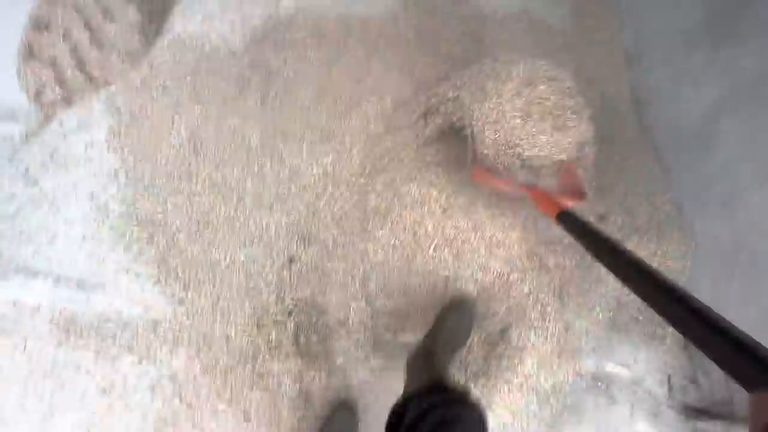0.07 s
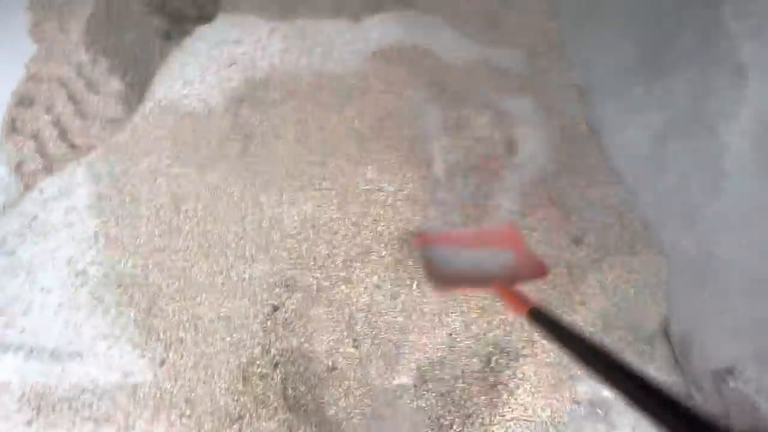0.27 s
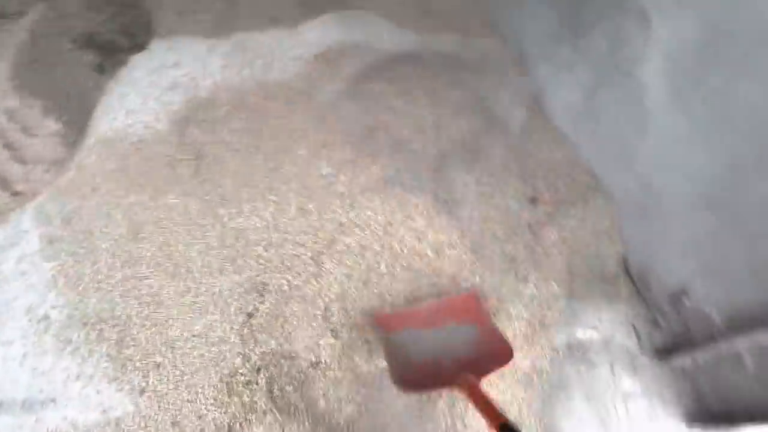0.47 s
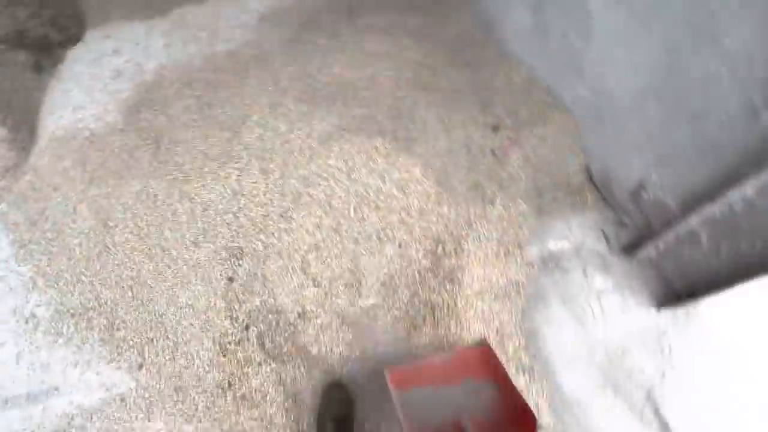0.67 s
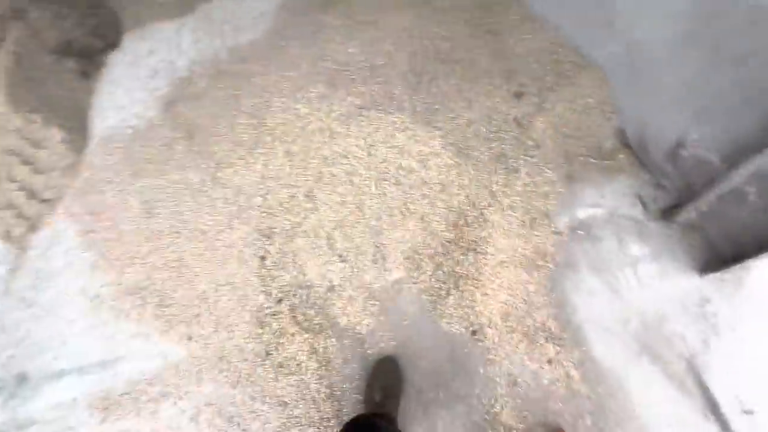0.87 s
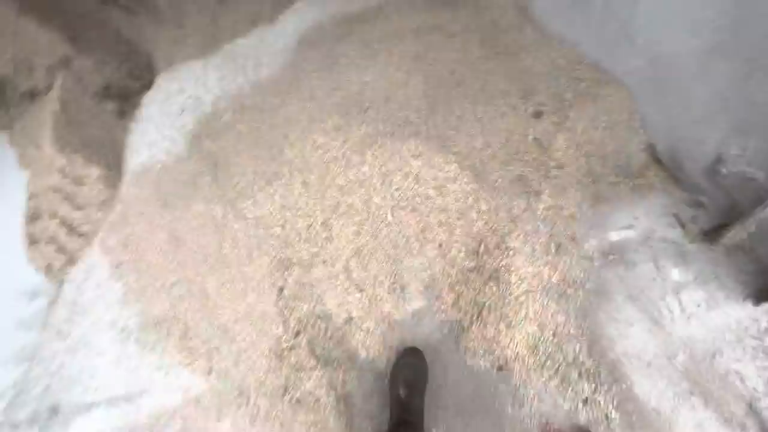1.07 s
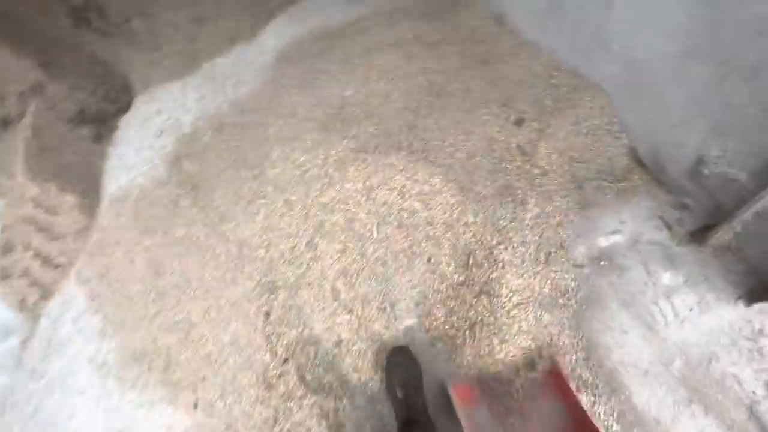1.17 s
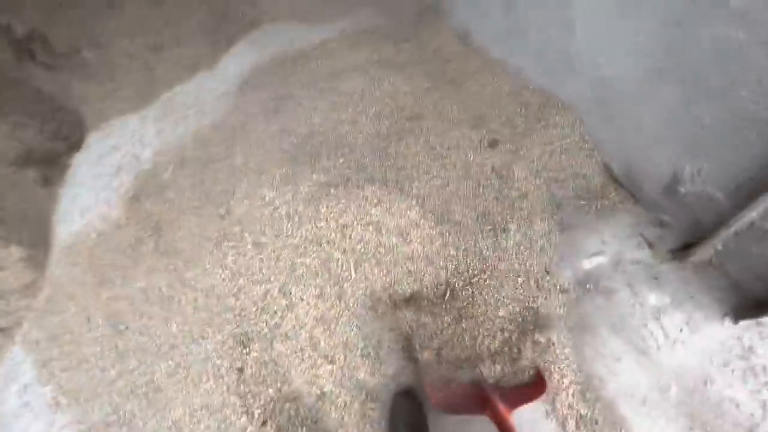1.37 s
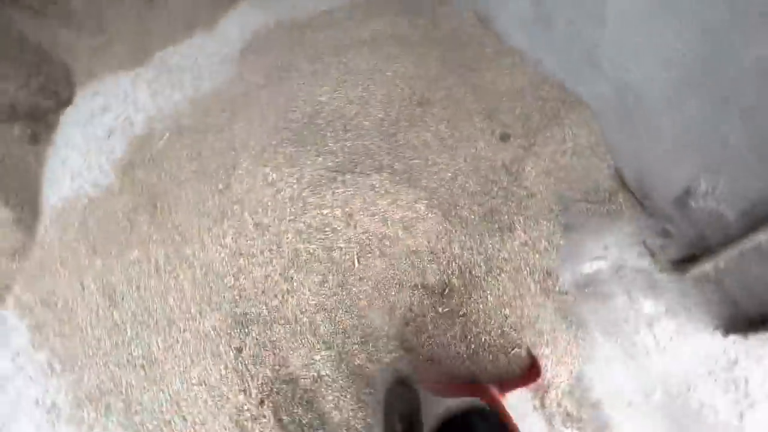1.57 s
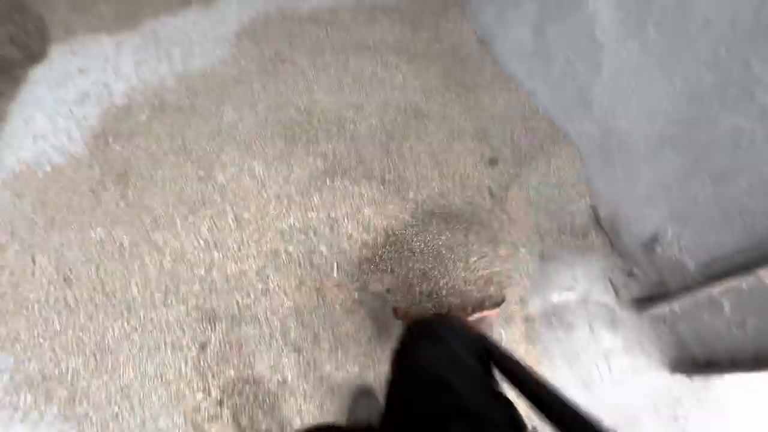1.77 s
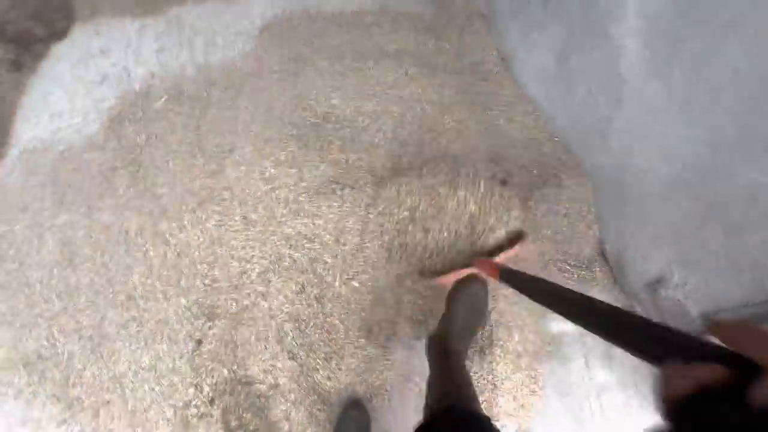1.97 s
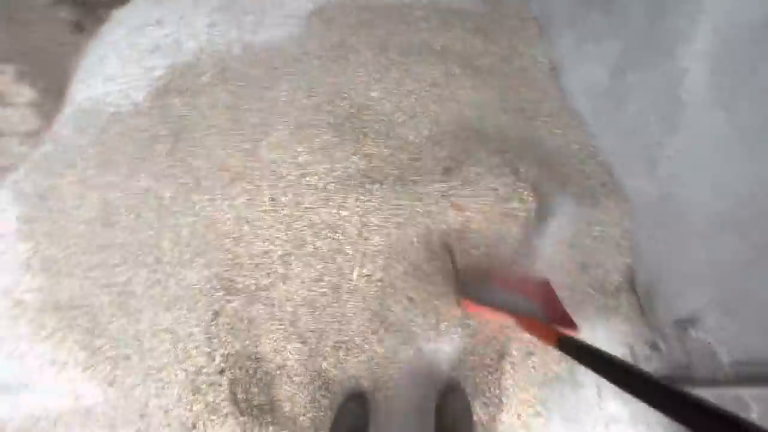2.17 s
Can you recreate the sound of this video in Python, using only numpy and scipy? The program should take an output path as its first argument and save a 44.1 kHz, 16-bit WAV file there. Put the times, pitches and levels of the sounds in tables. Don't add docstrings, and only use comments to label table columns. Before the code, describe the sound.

Plastic shovel scrape across gritty concrete with rattling knocks and husk crackle, followed by a boot step.

```python
import sys
import numpy as np
from scipy import signal
from scipy.fft import rfft, irfft, next_fast_len
from scipy.io import wavfile
from scipy.ndimage import uniform_filter1d, map_coordinates

SR = 44100
rng = np.random.default_rng(int(sys.argv[2]) if len(sys.argv) > 2 else 0)


def store_wav(level_fs):
    pcm = np.round(np.clip(np.atleast_2d(level_fs), -1, 1) * 32767)
    wavfile.write(sys.argv[1], SR, pcm.T.astype(np.int16))


def gain_from_db(level_db):
    decades = np.asarray(level_db, float) / 20
    return 10 ** decades


N = 98122
T = np.arange(N) / SR


def unit(x):
    return x / np.sqrt(np.mean(x ** 2) + 1e-20)


def along(points, hz):
    f, v = np.transpose(points)
    return np.interp(np.log(hz + 1), np.log(f + 1), v)


def wobble(knots_per_s):
    return map_coordinates(rng.standard_normal(2000), [T * knots_per_s], mode="wrap")


def noise():
    return rng.standard_normal((2, N))


def filtered(x, response):
    m = next_fast_len(N + SR // 2)
    return irfft(rfft(x, m) * response(np.fft.rfftfreq(m, 1 / SR)), m)[..., :N]


def body(peaks):
    def response(f):
        total = 0
        for k, (c, w, db) in enumerate(peaks):
            total = total + (-1) ** k * gain_from_db(db) * 1j * f * w / (c * c - f * f + 1j * f * w)
        return total
    return response


def colour(points):
    return lambda hz: gain_from_db(along(points, hz))


def grains(spread_db, life_s):
    size = gain_from_db(spread_db * rng.exponential(size=N)) * (rng.random(N) < .03)
    power = signal.lfilter([1], [1, -np.exp(-1 / (life_s * SR))], size ** 2)
    return unit(np.sqrt(power) * noise())


# t/s, pressure/dB, husk crackle over pressure/dB
STROKE_PRESSURE = [
    (0.977, -46.5, -14),
    (0.997, -32, -10.5),
    (1.06, -24, -5.5),
    (1.1, -20.5, -6.5),
    (1.189, -16, -10.5),
    (1.223, -20, -17),
    (1.273, -21.5, -23),
    (1.292, -26.5, -16.5),
    (1.345, -49.5, -34),
]
SLIPS = [1.086, 1.112]
# f/Hz, width/Hz, level/dB
BLADE_MODES = [(211.6, 49, -6), (398, 45, 3), (479, 130, -1), (634, 154, -4.5), (800, 67, 0.5),
               (1194, 162, -0.5), (1332, 200, -2.5), (1564, 96, -4), (1940, 600, -14)]
# f/Hz, level/dB per Hz
GRIT_SPECTRUM = [(1200, -10), (2000, -3.5), (3700, -3.5), (6400, -2.5), (7500, -10), (10200, -15.5),
                 (12500, -25), (16000, -25)]
# f/Hz, level/dB per Hz
CRACKLE_SPECTRUM = [(5000, -34), (7000, -59), (7900, 4.5), (9500, 5), (10300, -4), (11800, -10.5),
                    (15000, -13), (16000, -23)]
STICK_S, STICK_DB = .012, -8
GRIT_GROWTH = 1.26


def scrape():
    s, press_db, bright_db = np.transpose(STROKE_PRESSURE)
    press_db = np.interp(T, s, press_db, -120, -120) + 1.2 * wobble(45)
    bright_db = np.interp(T, s, bright_db)
    stick_db = 0
    for slip_s in SLIPS:
        stuck = np.clip(1 - (slip_s - T) / STICK_S, 0, 1) ** .5 * (T < slip_s)
        stick_db = stick_db + STICK_DB * stuck
    blade_db = press_db + stick_db - 0.5
    grit_db = 0.097 * stick_db + GRIT_GROWTH * (press_db + 18.5) - 26.5
    crackle_db = press_db + bright_db + 0.92 * wobble(120)
    blade = gain_from_db(blade_db) * unit(filtered(grains(0.34, 0.0035), body(BLADE_MODES)))
    grit = gain_from_db(grit_db) * unit(filtered(grains(0.56, 0.0021), colour(GRIT_SPECTRUM)))
    crackle = gain_from_db(crackle_db) * unit(filtered(grains(2.9, 0.00097), colour(CRACKLE_SPECTRUM)))
    return blade + grit + crackle


PATCHY_ABOVE_HZ, GONE_SHARE = 11700, .4


def patchy(x):
    hz, _, z = signal.stft(x, SR, nperseg=1024)
    field = uniform_filter1d(rng.standard_normal(z.shape[1:]), size=16, axis=0)
    field = uniform_filter1d(field, size=4, axis=1)
    gone = (field < np.quantile(field, GONE_SHARE)) & (hz[:, None] > PATCHY_ABOVE_HZ)
    return signal.istft(z * ~gone, SR, nperseg=1024)[1][:, :N]


# f/Hz, level/dB, t60/s
STRUCK_MODES = [(230, -8, .06), (360, 0, .08), (450, -3, .05), (610, -3, .05), (710, -1, .06),
                (800, 0, .06), (1000, -7, .035), (1190, -2, .045), (1310, -2, .05), (1480, -2, .04),
                (1670, -4, .04), (1950, -6, .04), (2400, -8, .03), (3000, -12, .02)]
# f/Hz, level/dB per Hz
RUSTLE_SPECTRUM = [(170, -10.5), (310, -0.5), (600, -6), (1200, -8.5), (2200, -13), (3500, -23),
                   (9000, -33)]
FOCUS_DB_PER_OCTAVE, RISE_S = 24, .0006
CRACK_T60_S, SCUFF_DB, SCUFF_T60_S = .018, -17, .055


def contacts(events, ring_share):
    ring, crack, scuff = np.zeros((2, N + SR)), np.zeros(N), np.zeros(N)
    t = np.arange(SR // 8) / SR
    hz, level_db, t60 = np.transpose(STRUCK_MODES)[..., None]
    life = t60 * ring_share
    chance = rng.random((len(events), 2, 2, len(STRUCK_MODES), 1))
    for (s, db, bright_db, pitch_hz), (size, turn) in zip(events, chance):
        focus_db = FOCUS_DB_PER_OCTAVE * abs(np.log2(hz / pitch_hz))
        near_db = db + level_db - focus_db + 3 * (size - .5)
        phase = 2 * np.pi * (hz * (.97 + 0.06 * size) * t + .2 * turn)
        modes = gain_from_db(near_db - 60 * t / life) * np.sin(phase)
        ring[:, round(s * SR):][:, :len(t)] += modes.sum(axis=1) * (1 - np.exp(-t / RISE_S))
        age = np.maximum(T - s, 0)
        crack += (T >= s) * gain_from_db(db + bright_db - 60 * age / CRACK_T60_S)
        scuff += (T >= s) * gain_from_db(db + SCUFF_DB - 60 * age / SCUFF_T60_S)
    ring = filtered(ring[:, :N], lambda f: 1 / np.sqrt(1 + (230 / (f + 1)) ** 6))
    grit_and_husk = lambda f: colour(GRIT_SPECTRUM)(f) + gain_from_db(-13.5) * colour(CRACKLE_SPECTRUM)(f)
    bright = unit(filtered(noise(), grit_and_husk))
    rustle = unit(filtered(grains(1.0, 0.00093), colour(RUSTLE_SPECTRUM)))
    return ring + crack * bright + scuff * rustle


# t/s, level/dB, brightness/dB, f/Hz
BLADE_KNOCKS = [(0.791, -29, -17, 1210), (0.792, -34, -17, 2000), (0.793, -40, -28, 350),
                (0.805, -36, -15, 1300), (0.811, -45, -25, 350), (0.866, -36, 3, 2400),
                (0.87, -29, -12, 800), (0.873, -18, -21, 640), (0.8745, -24, -22, 365),
                (0.8775, -22, -12, 1480), (0.882, -23, -22, 720), (0.885, -26, -22, 360),
                (0.894, -27, -20, 740), (0.954, -40, -3, 1500), (0.9605, -27, -12, 800),
                (0.961, -31, -12, 1480), (0.968, -27, -18, 460), (0.969, -30, -16, 1300),
                (0.9935, -21, -26, 454), (0.994, -24, -26, 800), (0.995, -27, -33, 1300),
                (1.019, -19.5, -28, 684), (1.031, -17, -10.5, 1310), (1.055, -14, -33, 785),
                (1.063, -18.5, -23, 1250), (1.078, -15.5, -19, 1230), (1.086, -12, -22, 800),
                (1.092, -14, -25, 450), (1.112, -11.5, -22, 795), (1.116, -16, -25, 1200),
                (1.122, -16, -25, 450), (1.143, -14, -20, 820), (1.152, -13, -25, 760),
                (1.163, -12, -25, 800), (1.168, -13, -25, 1310), (1.178, -14, -20, 1250),
                (1.188, -12, -20, 1310), (1.197, -14, -25, 1310), (1.203, -14, -25, 450),
                (1.232, -16.5, -27, 600), (1.248, -21, -25, 1220), (1.262, -14.5, -25, 463),
                (1.272, -22, -21, 1240), (1.287, -22.5, -25, 440)]


def knocks():
    return contacts(BLADE_KNOCKS, ring_share=.85)


# from t/s, to t/s, f/Hz, width/Hz, level/dB
EDGE_SKIDS = [
    (0.722, 0.851, 1240, 600, -55),
    (0.755, 0.848, 312, 161, -44.5),
    (1.695, 1.801, 1190, 700, -48.5),
    (1.79, 1.896, 1046, 450, -50),
]


def skids():
    out = 0
    for start, end, hz, width_hz, db in EDGE_SKIDS:
        swell = abs(np.sin(np.pi * np.clip((T - start) / (end - start), 0, 1))) ** .6
        level = gain_from_db(db + 3 * wobble(50))
        tone = filtered(noise(), lambda f: body([(hz, width_hz, 0)])(f) ** 2)
        out = out + level * swell * unit(tone)
    return out


# t/s, level/dB
HUSK_SNAPS = [
    (0.8862, -26),
    (1.077, -25),
    (1.0878, -15.5),
    (1.2789, -23.5),
    (1.622, -33),
]


def snaps():
    snap = sum((T >= s) * gain_from_db(db - 60 * np.maximum(T - s, 0) / 0.012) for s, db in HUSK_SNAPS)
    return snap * unit(filtered(noise(), colour(CRACKLE_SPECTRUM)))


# start t/s, length/s, level/dB, brightness/dB
LIGHT_DRAGS = [
    (0.763, 0.082, -49, -11.5),
    (0.9, 0.11, -49, -18),
    (1.284, 0.19, -47, -10.5),
    (1.608, 0.17, -40.5, -6.5),
    (1.837, 0.066, -52, 0.5),
    (1.703, 0.14, -47.5, -8.5),
]


def drags():
    low, high = np.zeros((2, N))
    for start, length, db, bright_db in LIGHT_DRAGS:
        progress = np.clip((T - start) / length, 0, 1)
        swell = gain_from_db(db) * abs(np.sin(np.pi * progress ** 0.48)) ** 0.43
        low, high = low + swell, high + swell * gain_from_db(bright_db)
    rustle = unit(filtered(grains(0.84, 0.0034), colour(RUSTLE_SPECTRUM)))
    grit = unit(filtered(grains(0.56, 0.0049), colour(GRIT_SPECTRUM)))
    return low * rustle + high * grit


# t/s, level/dB, brightness/dB, f/Hz
SOLE_CONTACTS = [
    (1.588, -37, -12, 700),
    (1.61, -36, -5, 900),
    (1.6137, -11, -16, 610),
    (1.617, -17, -20, 450),
    (1.621, -13, -9, 1670),
    (1.6235, -9.5, -17, 385),
    (1.631, -27, -12, 1000),
    (1.644, -23, -22, 680),
    (1.745, -42, -5, 350),
    (1.995, -49, -11, 230),
]


def sole():
    return contacts(SOLE_CONTACTS, ring_share=.5)


# t/s, level/dB, first f/Hz, last f/Hz, t60/s
BOOT_PUSHES = [
    (.56, -35, 420, 170, .06),
    (.572, -40, 110, 80, .1),
    (1.623, -21, 260, 180, .04),
    (1.633, -19, 120, 85, .09),
    (1.654, -26, 225, 200, .07),
    (1.655, -27, 75, 55, .25),
]


def boot_thuds():
    out = 0
    for s, db, first_hz, last_hz, t60 in BOOT_PUSHES:
        age = np.maximum(T - s, 0)
        sink = (first_hz - last_hz) * .02 * (1 - np.exp(-age / .02))
        phase = 2 * np.pi * (last_hz * age + sink)
        out = out + gain_from_db(db - 60 * age / t60) * (1 - np.exp(-age / .003)) * np.sin(phase)
    return out


# t/s, level/dB, left over right/dB
LEFT_TAP = (1.4395, -23, 11)
# f/Hz, level/dB, t60/s
TAP_RING = [(725, 4.5, 0.013), (950, 10, 0.009), (1850, 1.5, 0.011)]


def tap():
    s, level_db, left_db = LEFT_TAP
    age = np.maximum(T - s, 0)
    ring = sum(gain_from_db(db - 60 * age / t60) * np.sin(2 * np.pi * hz * age) for hz, db, t60 in TAP_RING)
    mono = gain_from_db(level_db) * (1 - np.exp(-age / 0.0013)) * ring
    return mono * gain_from_db([[left_db / 2], [-left_db / 2]])


# t/s, flow/dB, whole grains over chaff/dB
FEED_FLOW = [(0, -46, 3.5), (.04, -43.5, 3), (.16, -45, -5), (.24, -43, -4), (.29, -37.5, -6.5),
             (.33, -45.5, -1), (.58, -48.5, 1.5), (.72, -67.5, 5), (.8, -60, 0), (.85, -67.5, 6),
             (.94, -71, 3), (1.33, -59, 1), (1.44, -50, -1), (1.48, -56, -4), (1.6, -58, -3),
             (1.66, -48, 0), (1.8, -50, -3.5), (1.96, -46, -4), (2.22, -41.5, -2)]
# f/Hz, level/dB per Hz
HUSK_SPECTRUM = [(300, -34), (1000, -5), (3000, -8), (4500, -6.5), (7400, -7), (9000, -3), (10400, -8),
                 (15500, -11.5)]
COARSE_HZ = 6000


def trickle():
    s, flow_db, coarse_db = np.transpose(FEED_FLOW)
    patter = unit(filtered(grains(.8, .001), colour(HUSK_SPECTRUM)))
    coarse = filtered(patter, lambda f: 1 / (1 + (f / COARSE_HZ) ** 4))
    mixed = patter + (gain_from_db(np.interp(T, s, coarse_db)) - 1) * coarse
    return gain_from_db(np.interp(T, s, flow_db) + 1 + .7 * wobble(14) + .6 * wobble(60)) * mixed


# f/Hz, level/dB per Hz
MACHINE_SPECTRUM = [(12, -57), (20, -36), (35, 1.5), (65, 4), (161, -8), (372, -17.5), (500, -21.5),
                    (650, -27), (1100, -120)]
# t/s, level/dB
MACHINE_SWELL = [(0, -3), (.4, -1), (.55, 1.5), (1.2, 0.5), (1.5, 2.5), (2.2, 1.5)]
MACHINE_DB = -46.5


def rumble():
    level_db = MACHINE_DB + np.interp(T, *np.transpose(MACHINE_SWELL)) + 1.2 * wobble(9.82)
    return gain_from_db(level_db) * unit(filtered(noise(), colour(MACHINE_SPECTRUM)))


# f/Hz, level/dB per Hz
AIR_SPECTRUM = [(150, -11.5), (400, -2.5), (700, -8.5), (1300, -8), (2200, -13), (4000, -35.5), (9000, -38)]
AIR_DB = -55


def yard_air():
    return gain_from_db(AIR_DB + wobble(11.6)) * unit(filtered(noise(), colour(AIR_SPECTRUM)))


# f/Hz, side over mid/dB
SIDE_LEVEL = [(40, -15), (150, -10), (500, -6.5), (1200, -1.5), (2800, 0), (6000, -.5), (10000, 1),
              (15000, -2)]
# f/Hz, share of side that follows mid
SIDE_TIED = [(60, .9), (400, .92), (1000, .75), (2500, .55), (4000, .75), (6500, .75), (9000, .55),
             (14000, .6)]
# f/Hz, phase of that share/rad
SIDE_PHASE = [(60, -1.3), (250, -1.9), (600, -2.4), (1200, -1.4), (2500, -1.45), (3500, -.45), (6500, -.45),
              (8500, -1.5)]
# f/Hz, width/Hz, depth/dB
MID_NOTCHES = [(7600, 100, -10), (5400, 90, -5), (11050, 640, -34)]
# f/Hz, width/Hz, depth/dB
SIDE_NOTCHES = [(7700, 100, -12), (5600, 90, -4), (13400, 1150, -45)]


def ports(pair, count):
    def dips(rows, hz):
        return gain_from_db(sum(db * np.exp(-((hz - c) / w) ** 4) for c, w, db in rows[:count]))

    def side_response(hz):
        share = np.clip(along(SIDE_TIED, hz), 0, 1)
        mix = np.array([share * np.exp(1j * along(SIDE_PHASE, hz)), np.sqrt(1 - share ** 2)])
        return mix * gain_from_db(along(SIDE_LEVEL, hz)) * dips(SIDE_NOTCHES, hz)

    side = filtered(pair, side_response).sum(axis=0)
    mid = filtered(pair[0], lambda hz: dips(MID_NOTCHES, hz))
    return np.array([mid + side, mid - side])


def scene():
    stroke = patchy(scrape()) + knocks() + drags()
    around = sole() + trickle() + rumble() + yard_air()
    return ports(stroke + around, count=3) + ports(snaps() + skids(), count=2) + boot_thuds() + tap()


def low_pass(x):
    return signal.sosfilt(signal.butter(12, 16320, fs=SR, output="sos"), x)


TOP_HZ, LOW_CUT_HZ = 15850, 38


def record(dry):
    mix = filtered(dry, lambda hz: (hz < TOP_HZ) / np.sqrt(1 + (LOW_CUT_HZ / (hz + 1)) ** 8))
    return low_pass(mix)


dry = scene()
out = record(dry)
store_wav(out)
```